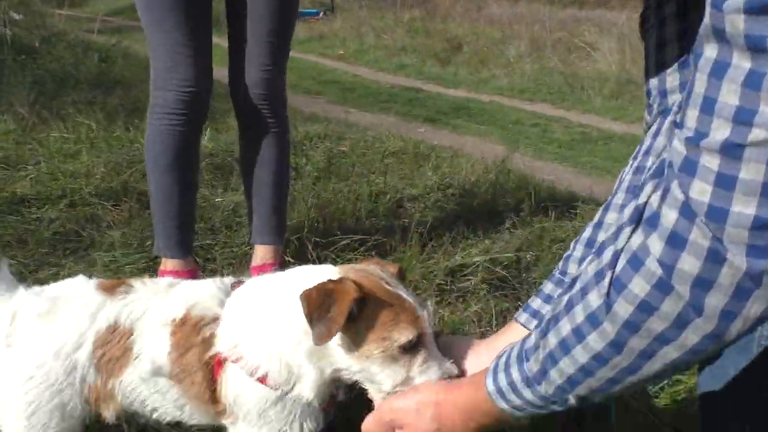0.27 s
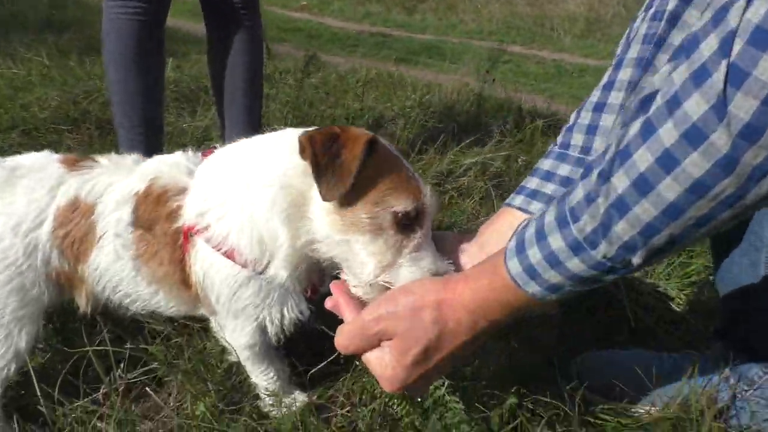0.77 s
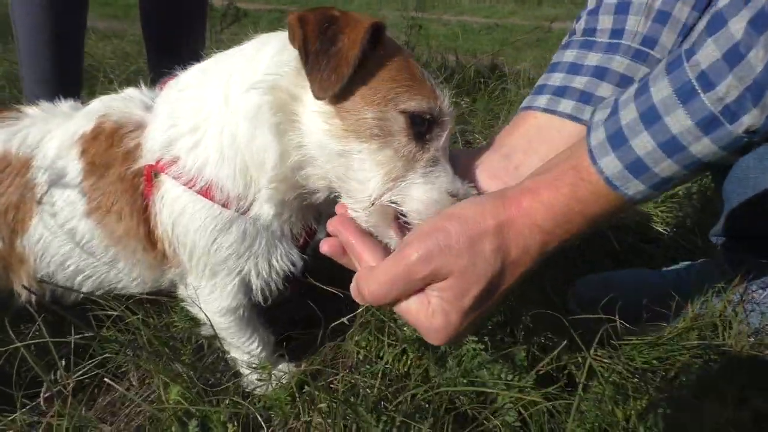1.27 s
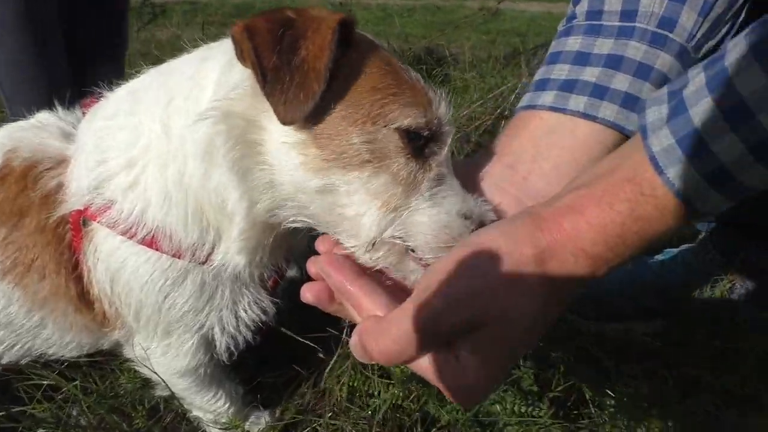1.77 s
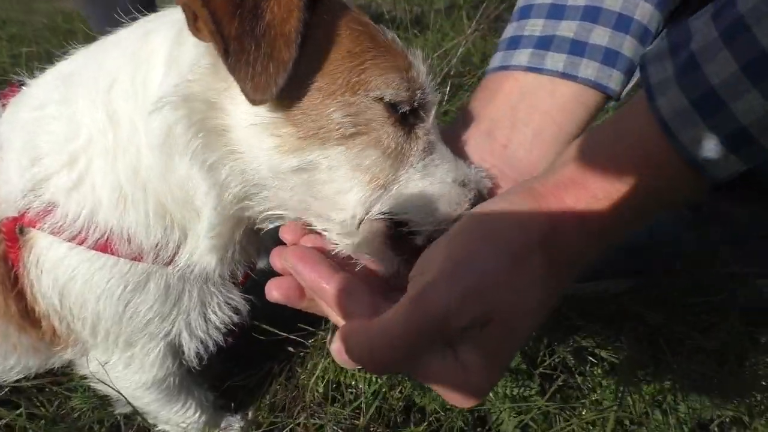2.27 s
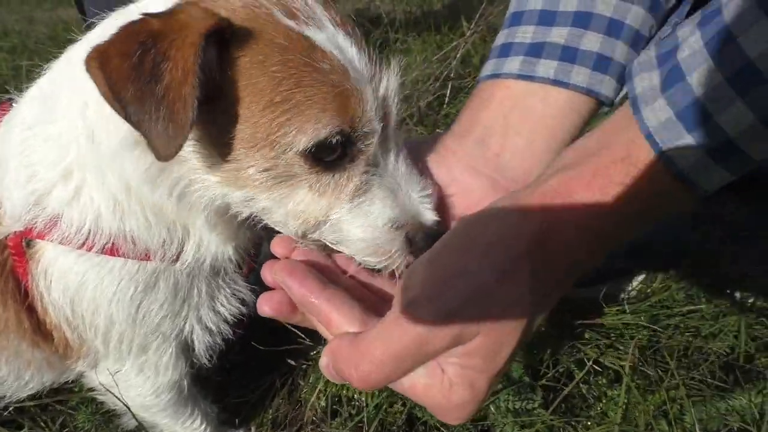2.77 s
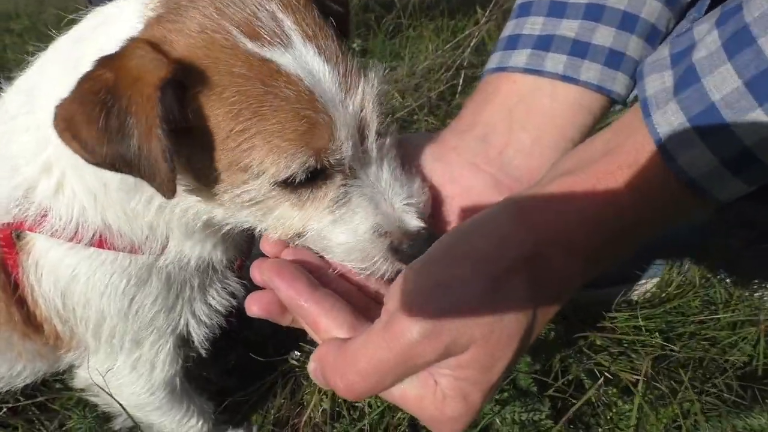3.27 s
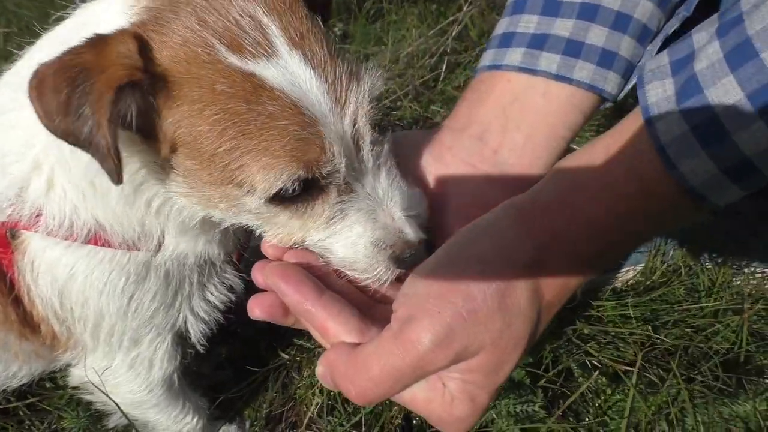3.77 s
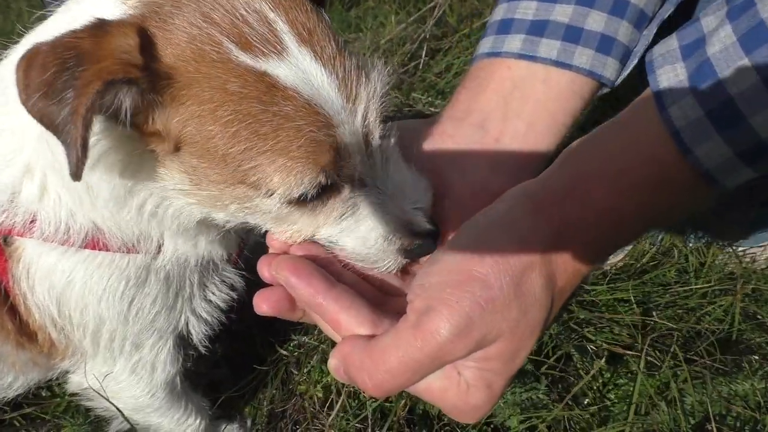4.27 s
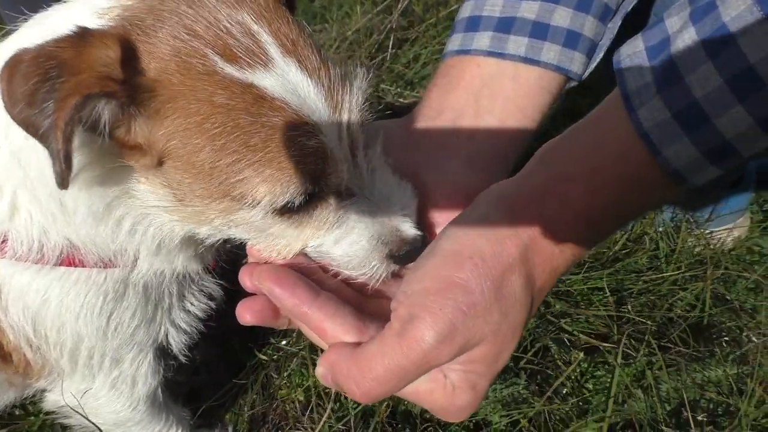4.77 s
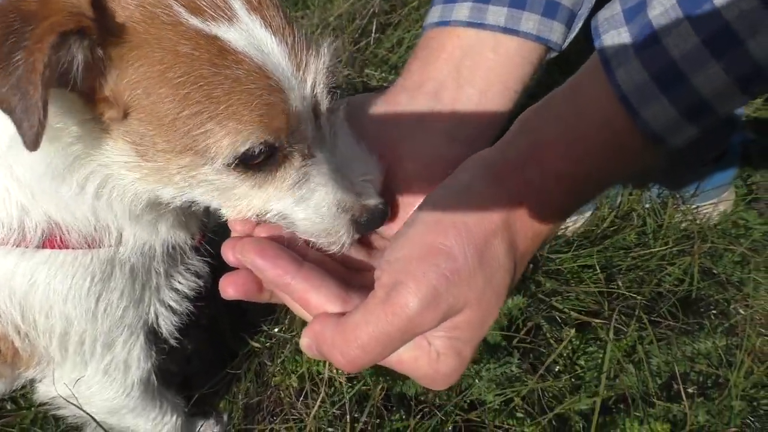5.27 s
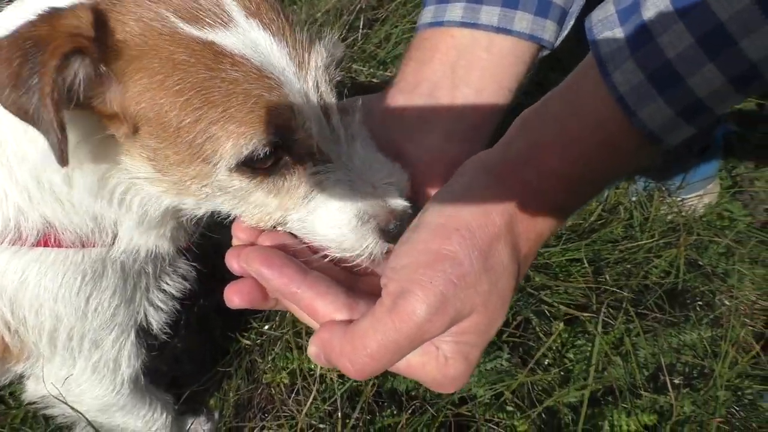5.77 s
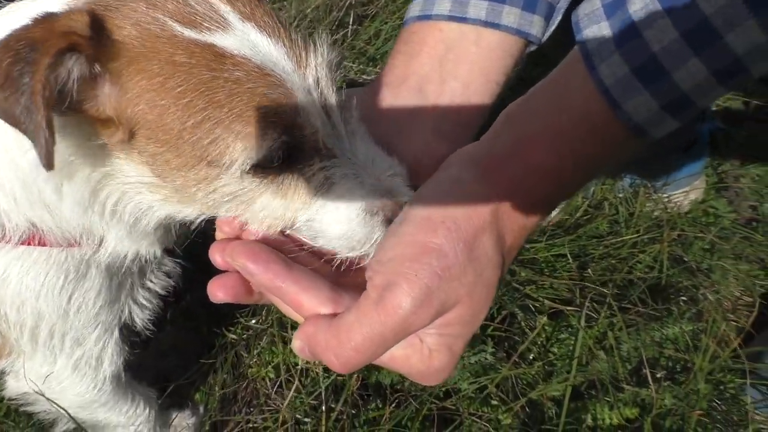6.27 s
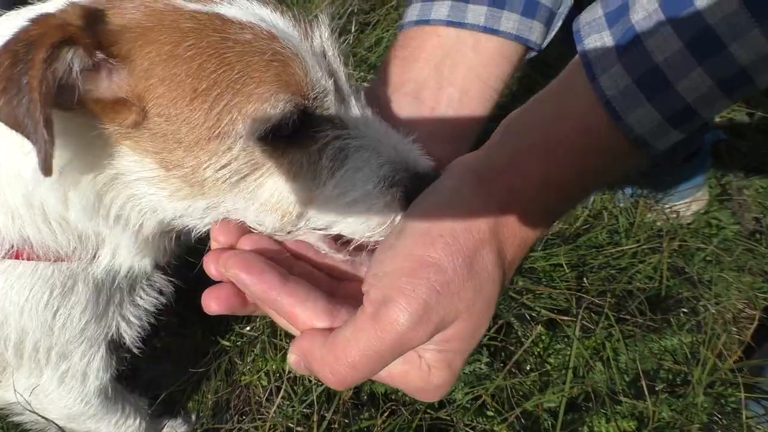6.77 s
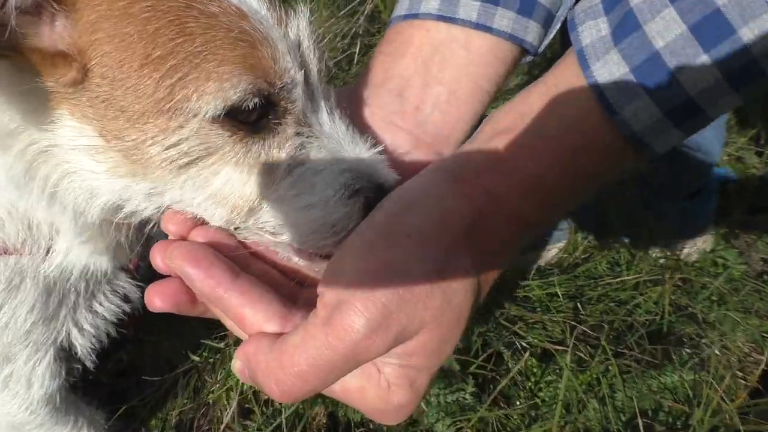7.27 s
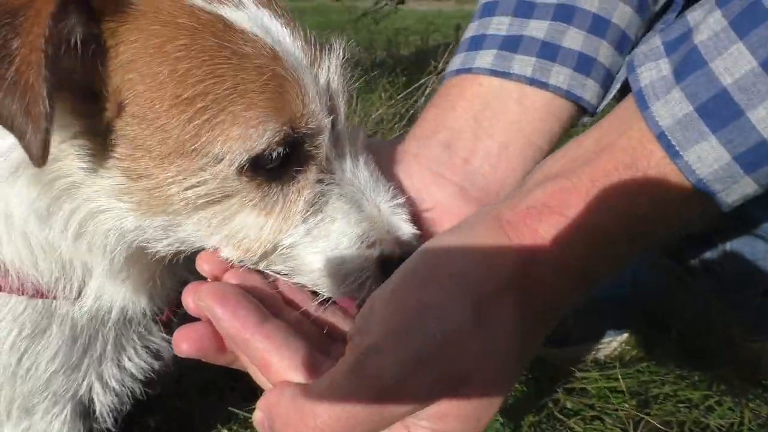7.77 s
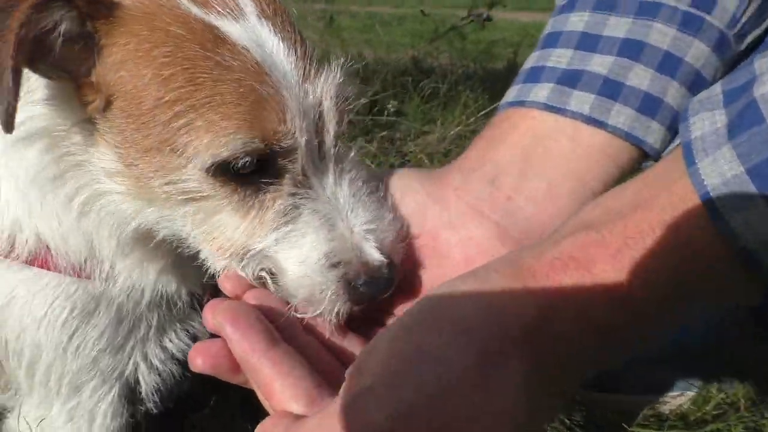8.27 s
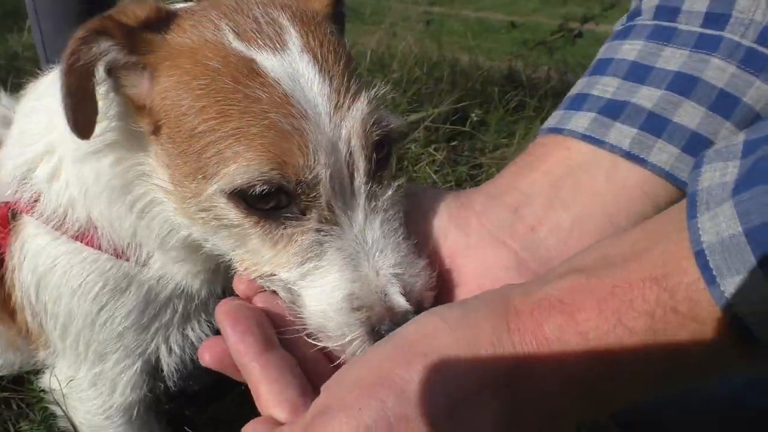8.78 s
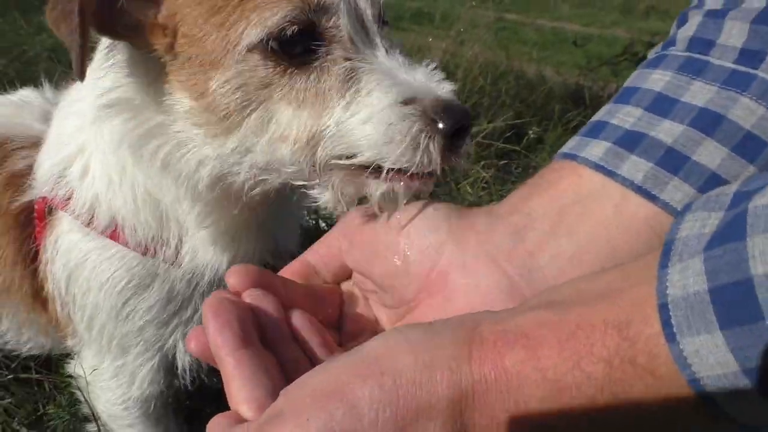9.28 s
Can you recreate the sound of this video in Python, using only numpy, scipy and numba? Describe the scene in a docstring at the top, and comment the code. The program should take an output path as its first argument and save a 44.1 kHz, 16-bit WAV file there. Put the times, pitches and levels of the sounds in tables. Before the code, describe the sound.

From 0 to 0.5 s, grass and cloth rustle briefly and a very short thin whistle is heard over soft meadow air and distant road rumble. A small dog begins lapping from a cupped palm, close to the microphone: gentle wet dips and smacks from about 0.5 s, with a sharp spit snap near 1.9 s. A little rustling returns around 2.8 s. The licks grow quicker and brighter, three per second, loudest from 3.5 to 5.4 s, each a bubbly slurp, popping water and a crisp lip smack. At 5.4 s a strong click comes with a dull muzzle bump, and the background suddenly falls quieter, then slowly returns. From 5.6 to 9.1 s the licks are softer and more separated, with one bright pop and bump at 7.7 s. Around 9.3 s come two faint thumps, a last weak smack and a tiny high whistle. Faint engine hums waver far away.

```python
"""First a brief rustle and a thin whistle over a far road's rumble; then a small dog laps water from a cupped
hand in a meadow, close to the microphone. Each lick bursts air pockets, modelled as decaying sines of rising
pitch; snapping spit, a slurp of many small bubbles and smacks ringing the mouth cavity surround them.
Grass and cloth rustle as flickering noise, engine notes hum as wavering sines, thin whistles come and go."""
import sys
import numpy as np
from scipy import signal
from scipy.fft import rfft, irfft, next_fast_len
from scipy.io import wavfile
from scipy.ndimage import uniform_filter1d
from numba import njit

SR = 44100
rng = np.random.default_rng(int(sys.argv[2]) if len(sys.argv) > 2 else 0)


def materialize(psi):
    """Save the field psi as 16-bit PCM at rate SR to the path in sys.argv[1].

    A 1-D psi becomes a single channel; in a 2-D psi each row is a channel.
    """
    bounded = np.clip(np.atleast_2d(psi).T, -1, 1)
    quanta = np.round(bounded * 32767).astype(np.int16)
    wavfile.write(sys.argv[1], SR, quanta)


N = 419391
T = np.arange(N) / SR


def undb(db):
    """Decibel definition: amplitude gain of a level in dB."""
    return 10 ** (np.asarray(db) / 20)


def level(x, db):
    """Normalisation by effective value: scale to an rms level in dB."""
    return x * undb(db) / np.sqrt(np.mean(x ** 2))


@njit
def bubbles(s, gain, hz, t60, glide, rise_s):
    """Free decay of an air pocket: a sine falls 60 dB in t60 while its pitch climbs as the pocket opens."""
    out = np.zeros(N)
    for k in range(len(s)):
        i, phase, f = int(s[k] * SR), 0., hz[k]
        length = int(t60[k] * SR)
        for j in range(min(length, N - i)):
            phase += 2 * np.pi * min(f * (1 + glide * j / length), .45 * SR) / SR
            onset = 1 - np.exp(-j / (rise_s * SR))
            out[i + j] += gain[k] * onset * np.exp(-6.9 * j / length) * np.sin(phase)
    return out


def swarm(s, db, hz, late_s, spread, drop_db, cycles, count):
    """Secondary bubbles: each burst is followed by weaker ones scattered in time, pitch and strength."""
    u = rng.random((len(s), count, 3))
    at = s[:, None] + late_s * u[..., 0]
    f = hz[:, None] * np.exp(spread * (2 * u[..., 1] - .6))
    f = np.clip(f, 1150, 15500)
    gain = undb(db[:, None] - drop_db - 6 * u[..., 2])
    return bubbles(at.ravel(), gain.ravel(), f.ravel(), (cycles / f).ravel(), .15, .0002)


def stream(low_hz, span, skew, spread_db, cycles, count, size, glide=.2):
    """Random superposition: bubbles burst in groups of size that share a moment and a strength; rms 1."""
    u = rng.random((count, 4))
    lead = u[np.arange(count) // size * size]  # each group borrows one row of draws
    s = lead[:, 0] * T[-1] + .0015 * u[:, 0]
    hz = low_hz * np.exp(span * u[:, 1] ** skew)
    gain = undb(-spread_db * np.log(.03 + lead[:, 2]))
    t60 = cycles * (.4 + u[:, 3]) / hz
    return level(bubbles(s, gain, hz, t60, glide, .0003), 0)


def swells(s, length, db, rise=1.):
    """Amplitude envelope: bells of given width at half height; rise is rising over falling flank."""
    out = np.zeros(N)
    for at, n, d in np.broadcast(s, length, db):
        near = slice(max(int((at - 2 * n) * SR), 0), int((at + 3 * n) * SR))
        late = T[near] - at + n / 2 * (1 - rise) / (1 + rise)  # time after the peak
        flank = n * np.where(late < 0, rise, 1)
        out[near] += undb(d) * .5 ** (late * (1 + rise) / flank) ** 2
    return out


def walk(rate):
    """Slow random modulation: levels held 1 / rate s and slewed twice; spread near 1."""
    k = int(SR / rate)
    held = np.repeat(rng.standard_normal(N // k + 1), k)
    return 1.523 * uniform_filter1d(uniform_filter1d(held, k), k)[:N]


def along(table, hz):
    """Spectral interpolation: read a table over log frequency."""
    f, v = np.transpose(table)
    return np.interp(np.log(hz + 1), np.log(f), v)


# coherence of the diffuse field: (frequency [Hz], left-right correlation [1])
LIKENESS = [(30, 0.83), (150, 0.97), (400, 0.83), (3000, 0.84)]


def hiss(colour):
    """Spectral shaping of noise: independent mid and side set the left-right correlation; overall rms 1."""
    size = next_fast_len(N)
    hz = np.arange(size // 2 + 1) * SR / size
    likeness = np.clip(along(LIKENESS, hz), 0, 1)
    mid, side = (rfft(rng.standard_normal(size)) * undb(along(colour, hz)) for _ in range(2))
    mid = irfft(mid * np.sqrt(1 + likeness), size)[:N]
    side = irfft(side * np.sqrt(1 - likeness), size)[:N]
    return level(np.array([mid + side, mid - side]), 0)


# the background level, as if turned down by a recorder's gain control, drops suddenly at 5.4 s
# and creeps back: (time [s], level offset [dB])
BACKGROUND = [(0, -4), (5.40, -7), (5.425, -20), (5.52, -13), (8.8, -11), (9.51, -7.5)]


def background_db():
    """Level contour: piecewise-linear offset in dB, one value per sample."""
    return np.interp(T, *np.transpose(BACKGROUND))


# the loudest air pockets burst by the tongue: (time [s], level [dB], starting pitch [Hz])
POPS = [(0.7077, -23, 2410), (0.7118, -20.5, 2380), (0.7931, -24.5, 1750), (0.9988, -19, 2490),
        (1.2253, -15, 2060), (1.2375, -23, 1500), (1.32, -32, 740), (1.372, -30, 1150),
        (1.6642, -18.5, 1570), (1.761, -17.5, 2700), (1.7828, -24, 1270), (1.8282, -22, 2050),
        (1.841, -15.5, 2660), (2.1237, -20.5, 2180), (2.1354, -28, 1100), (2.2148, -17, 2980),
        (2.2559, -12.5, 1710), (2.3993, -22, 1950), (2.4324, -13, 2880), (2.4411, -11.5, 2630),
        (2.5, -34, 700), (2.5417, -18.5, 1730), (2.595, -27, 3000), (2.765, -26, 1280), (2.785, -22, 2300),
        (2.8004, -21, 1210), (2.8588, -13.5, 1600), (2.8948, -8.5, 1570), (3.024, -21, 1440),
        (3.0325, -18, 2520), (3.0467, -17, 2600), (3.0624, -19, 2800), (3.0808, -15.5, 2780),
        (3.1241, -24, 1470), (3.14, -23, 1610), (3.177, -14.5, 1320), (3.3336, -20, 2430),
        (3.351, -15, 2100), (3.371, -14.5, 2390), (3.3847, -15, 3010), (3.4545, -16, 2490),
        (3.4572, -10, 3990), (3.608, -23, 1220), (3.6125, -31, 744), (3.756, -22, 4500),
        (3.7595, -19, 1560), (3.7667, -18, 1650), (3.7812, -10, 1890), (3.9438, -11, 4600),
        (3.9715, -9.5, 2480), (3.9951, -16, 1840), (4.0058, -17, 2940), (4.0141, -22, 2520),
        (4.0356, -23, 1660), (4.0886, -5.5, 2620), (4.0984, -23, 1310), (4.17, -18, 1460),
        (4.1712, -20, 3400), (4.2284, -13.5, 3170), (4.2413, -11, 1900), (4.2503, -17, 2200),
        (4.255, -10, 2140), (4.276, -24, 2500), (4.283, -24, 2400), (4.3, -20, 1870), (4.3136, -13.5, 2580),
        (4.339, -25, 2900), (4.3783, -3.5, 2860), (4.383, -10, 2770), (4.5707, -20.5, 2370),
        (4.5848, -31, 780), (4.5931, -8, 2440), (4.6065, -17, 2350), (4.622, -9, 3120), (4.702, -3.5, 3060),
        (4.7085, -11.5, 2720), (4.884, -22.5, 1570), (4.956, -21.5, 1440), (4.9166, -21, 2760),
        (4.9615, -16, 2090), (5.0417, -20, 3570), (5.0462, -10, 4340), (5.0557, -13, 2540),
        (5.1913, -24, 1830), (5.2826, -13.5, 2580), (5.3141, -24, 2610), (5.3581, -22, 1160),
        (5.3703, -17, 2540), (5.395, -19, 1430), (5.4045, -3, 4160), (5.4157, -24, 1140),
        (5.5593, -26, 1160), (5.6066, -19.5, 2000), (5.6143, -22, 1740), (5.696, -28, 2710),
        (5.717, -19.5, 2500), (5.7244, -24, 1520), (5.9689, -21.5, 1920), (5.9856, -28, 2240),
        (6.0493, -19.5, 2170), (6.056, -25, 1600), (6.067, -29, 1350), (6.2111, -26, 1720),
        (6.3189, -28, 1810), (6.3647, -24, 2600), (6.3925, -28, 1960), (6.5848, -23.5, 2900),
        (6.6247, -23, 2150), (6.674, -15.5, 4710), (6.6857, -19, 3380), (6.696, -14.5, 3220),
        (6.6966, -19, 1210), (6.8502, -29, 2610), (6.984, -19, 3600), (7.004, -11.5, 3030),
        (7.0124, -22.5, 1310), (7.0227, -15.5, 4070), (7.2212, -20, 2520), (7.3551, -20, 1480),
        (7.7119, -5.5, 4420), (7.7463, -24, 1500), (7.9555, -26, 1520), (8.0225, -18, 3170),
        (8.038, -22.5, 1570), (8.042, -20, 1510), (8.069, -24, 3280), (8.074, -16, 1540),
        (8.2002, -20, 2830), (8.3078, -29, 1310), (8.3338, -21, 2900), (8.4053, -18, 2740),
        (8.5046, -23.5, 1740), (8.7225, -19, 1600), (8.7262, -18, 2150), (8.7412, -23, 1400),
        (8.7445, -19, 1500), (9.0912, -18, 4310), (9.1106, -17, 3290), (9.1202, -24, 1390)]


def pops():
    """Bubble resonance: pockets crack open and ring a few cycles, with a ragged spray and a bright edge."""
    s, db, hz = np.transpose(POPS)
    ring = bubbles(s, undb(db), hz, 20 / hz, .08, .00045)
    crack = bubbles(s, undb(db - 9.), 1.3 * hz, 6.5 / hz, .3, .00015)
    spray = swarm(s, db, hz, .006, .4, 10., 16., count=3)
    edge = swarm(s, db, 3 * hz, .002, .4, 22., 22., count=2)
    return ring + crack + spray + edge


DIP_S, SCOOP_S = .045, .055  # widths at half height
DIP_FIZZ_DB = -11  # fizz relative to gurgle
DRIPS_DB = -52.5  # before the background contour
# every lick, the tongue dips in, scoops, and the mouth smacks shut:
# (dip time [s], dip level [dB], scoop time [s], scoop level [dB], scoop fizz above gurgle [dB],
#  smack time [s], smack width at half height [s], smack level [dB], smack fizz above gurgle [dB])
LICKS = [(0.467, -46, 0.702, -43, -13, 0.793, .012, -47, -9),
         (0.933, -50, 1.008, -46, -6, 1.233, .03, -43, -12),
         (1.338, -49, 1.575, -39, -16, 1.664, .012, -48, -9),
         (1.803, -39, 1.847, -42, -12, 1.928, .014, -36, -4),
         (2.08, -55, 2.147, -41.5, -8.5, 2.26, .012, -39, 0),
         (2.36, -52, 2.428, -41, -25, 2.541, .017, -33, -5),
         (2.775, -39, 2.863, -46, -11, 2.897, .014, -46, -6),
         (2.964, -47.5, 3.044, -36.5, -11, 3.18, .014, -42, -6),
         (3.282, -44.5, 3.356, -37.5, -9.5, 3.454, .016, -30, -5.5),
         (3.553, -47, 3.623, -35, -14, 3.758, .013, -29, -6),
         (3.904, -47, 3.975, -36, -15, 4.091, .012, -29, -14),
         (4.2, -43, 4.26, -35, -17, 4.381, .008, -28, -9),
         (4.52, -50, 4.59, -39, -11.5, 4.708, .017, -35, -8.5),
         (4.82, -48, 4.92, -40, -17, 5.049, .018, -31, -10),
         (5.197, -41, 5.292, -38, -12, 5.39, .035, -36, -10),
         (5.505, -49, 5.6, -45, -10, 5.715, .013, -33, -5),
         (5.67, -49, 5.971, -49.5, -7.5, 6.048, .022, -40, -16),
         (6.2, -56, 6.304, -47, -9, 6.372, .02, -38, -16),
         (6.571, -49, 6.622, -45.5, -18, 6.692, .018, -36, -12),
         (6.877, -54, 6.938, -47, -13, 7.006, .025, -34, -14),
         (7.13, -58, 7.223, -48, -9, 7.358, .011, -31, -11),
         (7.55, -56, 7.612, -48, -9, 7.71, .014, -37, -4),
         (7.863, -53, 7.954, -44, -5, 8.074, .012, -36, -4),
         (8.245, -53, 8.318, -46, -8, 8.409, .022, -38, -6),
         (8.56, -48, 8.643, -47, -8, 8.723, .009, -33, -7), (8.906, -56, 9, -47, -5, 9.104, .03, -41, -5),
         (9.28, -53, 9.38, -53, -8, 9.46, .06, -55, -10)]


def slurp():
    """Bubble-cloud superposition: strokes swell with gurgle, far-gliding bubbles and fizz; drips between."""
    dip_s, dip_db, scoop_s, scoop_db, scoop_fizz_db = np.transpose(LICKS)[:5]
    dip = swells(dip_s, DIP_S, dip_db)
    gurgle_gain = dip + swells(scoop_s, SCOOP_S, scoop_db)
    fizz_gain = undb(DIP_FIZZ_DB) * dip + swells(scoop_s, SCOOP_S, scoop_db + scoop_fizz_db)
    gurgle = stream(1120., 1.25, 1.05, 4.4, 30., count=4500, size=2)
    gurgle += undb(-7) * stream(1200., .9, 1.1, 4.5, 60., count=500, size=1, glide=1.1)
    fizz = stream(4000., 1.3, .95, 4.6, 30., count=6000, size=3)
    drips = stream(1124., 2.555, 1.207, 2.7, 40., count=1500, size=2)
    return gurgle_gain * gurgle + fizz_gain * fizz + undb(background_db() + DRIPS_DB) * drips


def crackle(per_s, spread_db):
    """Impulsive shot noise: single clicks at random moments, most of them small; rms 1."""
    u = rng.random((N, 3))
    clicks = (u[:, 0] < per_s / SR) * np.sign(u[:, 1] - .5)
    return level(clicks * undb(-spread_db * np.log(.03 + u[:, 2])), 0)


# cavity of the closing mouth: (resonance [Hz], width of each filter pass [Hz], level [dB])
MOUTH = [(1600, 500, 0), (2800, 700, -4), (4600, 800, -9), (7600, 1500, -15)]


def mouth(x):
    """Cavity resonance: parallel modes, each filtered twice, ring briefly at every click; rms 1."""
    out = np.zeros(N)
    for hz, width, db in MOUTH:
        b, a = signal.iirpeak(hz, hz / width, SR)
        out += undb(db) * signal.lfilter(b, a, signal.lfilter(b, a, x))
    return level(out, 0)


SMACK_RISE, FIZZ_SHARE = .3, .6  # rise over fall; fizz width over smack width
PLOP_HZ, PLOP_DB = 690, -12  # low pocket of the closing mouth; level relative to the smack


def smacks():
    """Impulse excitation of a cavity: tearing spit rings the mouth, with gurgle, fizz and a low pocket."""
    s, length, db, fizz_db = np.transpose(LICKS)[5:]
    wet = mouth(crackle(600., 4.5))
    wet = wet + undb(-7) * stream(1150., 1.1, 1.2, 3.5, 18., count=7000, size=1)
    fizz = stream(4000., 1.3, .9, 4., 28., count=16000, size=4)
    plop = bubbles(s, undb(db + PLOP_DB), PLOP_HZ + 0 * s, .024 + 0 * s, .08, .0004)
    wet_gain = swells(s, length, db, SMACK_RISE)
    fizz_gain = swells(s, FIZZ_SHARE * length, db + fizz_db, SMACK_RISE)
    return wet_gain * wet + fizz_gain * fizz + plop


# the loudest spit films that snap at the lips: (time [s], level [dB], starting pitch [Hz])
TICKS = [(0.025, -24.5, 5700), (1.102, -31, 11500), (1.193, -29, 11000), (1.3447, -28, 5450),
         (1.536, -28, 10500), (1.5518, -23, 9100), (1.8, -27, 11500), (1.821, -28, 7600), (1.925, -6, 8300),
         (2.136, -28, 10500), (2.2144, -22, 7660), (2.2557, -24, 7030), (2.354, -30, 11500),
         (2.378, -27, 9500), (2.5416, -22, 9700), (3.1364, -24.5, 7400), (3.4466, -18.5, 9300),
         (3.4514, -18, 6600), (3.6153, -24, 5600), (3.755, -19, 13500), (3.7661, -21, 8000),
         (3.7808, -20, 7100), (4.2552, -27, 5400), (4.261, -26.5, 7200), (4.38, -18, 9050),
         (4.5716, -29, 5080), (4.702, -18, 8010), (5.045, -10, 11800), (5.0487, -9, 11200),
         (5.256, -28, 12000), (5.2865, -20, 4800), (5.3868, -24, 6230), (5.405, -17, 10500),
         (5.7114, -14, 11700), (5.7168, -18, 12400), (6.0526, -26.5, 8700), (6.0138, -32, 6000),
         (6.893, -35, 10000), (7.3455, -32, 6000), (7.3538, -30, 8500), (7.3597, -30, 8000),
         (7.7031, -21, 9400), (7.7117, -13, 5020), (7.712, -19, 13000), (8.042, -28, 6000),
         (8.0734, -21, 4900), (8.4083, -25, 12390), (8.7225, -24, 4500), (8.7415, -28, 4800)]


def ticks():
    """Film rupture: spit snaps as short clusters of very small bubbles, closely spaced in pitch."""
    s, db, hz = np.transpose(TICKS)
    snap = bubbles(s, undb(db), hz, 18 / hz, .018, .0001)
    return snap + swarm(s, db, hz, .003, .3, 2., 26., count=7)


# thumps of muzzle on palm: (time [s], level [dB], pitch [Hz])
THUMPS = [(5.406, -22.5, 302), (7.711, -26.5, 305), (9.272, -32, 250), (9.292, -34, 250)]


def thumps():
    """Heavily damped impact: the muzzle knocks the palm with one short dull push."""
    s, db, hz = np.transpose(THUMPS)
    return bubbles(s, undb(db), hz, np.full(len(s), .005), 0., .00024)


# thin whistles, perhaps the dog's nose; the level is before flutter, the pitch before jitter:
# (start [s], end [s], first pitch [Hz], middle pitch [Hz], last pitch [Hz], level [dB])
WHISTLES = [(0, .1, 1955, 1985, 2010, -53), (4.73, 4.82, 10050, 9750, 9300, -70),
            (7.03, 7.15, 9650, 10050, 9200, -68), (9.43, 9.49, 9500, 9750, 9900, -62),
            (9.43, 9.51, 14500, 14600, 14500, -65)]


def whistles():
    """Frequency modulation: thin tones glide along parabolas, with small flutter in level and pitch."""
    out = np.zeros(N)
    for start, end, first_hz, mid_hz, last_hz, db in WHISTLES:
        at = np.clip((T - start) / (end - start), 0, 1)
        hz = np.polyval(np.polyfit([0, .5, 1], [first_hz, mid_hz, last_hz], 2), at)
        on = np.clip(8 * np.minimum(at, 1 - at), 0, 1)
        jitter = .004 * min(first_hz, 3000) / hz * walk(40)
        phase = 2 * np.pi * np.cumsum(hz * (1 + jitter)) / SR
        out += on * undb(db + 2.5 * walk(40)) * np.sin(phase)
    return out


RUSTLE_BED_DB = -62  # before the background contour
# spectrum of the rubbing: (frequency [Hz], relative density [dB per Hz])
RUSTLE_COLOUR = [(900, -30), (1500, -8), (3000, -4), (7500, -2), (11000, 1), (15800, -1)]
# grass and cloth rustling: (centre [s], width at half height [s], envelope level [dB])
RUSTLES = [(0.0, .1, -48), (0.18, .08, -46), (0.43, .2, -46), (1.03, .2, -56), (1.55, .2, -55),
           (2.83, .15, -46), (3.1, .4, -57), (9.5, .2, -60)]


def rustle():
    """Friction noise: blades and cloth rub as an unevenly flickering hiss with fine crackle."""
    flicker = 1.2 * walk(60) + 1.6 * walk(17)  # in dB
    gain = swells(*np.transpose(RUSTLES)) + undb(RUSTLE_BED_DB + background_db())
    snaps = stream(6000., .9, .9, 5., 22., count=900, size=6)
    return (hiss(RUSTLE_COLOUR) * undb(flicker) + undb(-9) * snaps) * gain


AIR_DB = -46  # before the background contour and the slow drift
# spectrum of meadow air and far road: (frequency [Hz], relative density [dB per Hz])
MEADOW = [(20, -54), (45, -8), (70, -3), (175, -0.5), (400, -10), (620, -17.5), (850, -15), (1100, -8),
          (1500, -10.5), (3000, -15), (6000, -24.5), (15800, -33.5)]
# far engine notes: (start [s], end [s], mean pitch [Hz], level before flutter [dB])
HUMS = [(0.095, .45, 214.6, -58), (1.5, 2.765, 214.2, -56), (3.3, 5.297, 170.7, -64),
        (5.5, 7.8, 170.7, -65)]


def surroundings():
    """Diffuse background noise: meadow air and far road as coloured hiss, with wavering engine notes."""
    air = hiss(MEADOW) * undb(AIR_DB + background_db() + .33 * walk(2.43))
    for start, end, hz, db in HUMS:
        swell = np.clip(np.minimum(T - start, end - T) / .09, 0, 1)
        flutter = 2.5 * walk(12)  # in dB
        phase = 2 * np.pi * np.cumsum(hz * (1 + .008 * walk(7))) / SR
        air = air + swell * undb(db + flutter) * np.sin(phase)
    return air


PALM_HZ = 860  # high-pass corner of the water sounds
LEFT_DB = .3  # the dog's common part is this much stronger at the left


def scene():
    """Stereo phase difference: the dog sits in the middle, slightly out of phase at two microphone ports."""
    # so small a pool radiates little below about a kilohertz
    small_pool = signal.butter(3, PALM_HZ, "high", fs=SR, output="sos")
    water = signal.sosfilt(small_pool, pops() + slurp() + smacks())
    snaps = ticks()
    dog = water + snaps + thumps() + whistles()
    quadrature = signal.hilbert(dog, next_fast_len(N)).imag[:N]
    wide = undb(-21) * quadrature + .07 * snaps  # the lips lie a little to the left
    return np.array([undb(LEFT_DB) * dog + wide, dog - wide]) + surroundings() + rustle()


TOP_HZ = 15700  # upper band limit


def record(dry):
    """Band limitation: a steep elliptic low-pass cuts the top."""
    return signal.sosfilt(signal.ellip(10, .2, 70, TOP_HZ, fs=SR, output="sos"), dry)


dry = scene()
out = record(dry)
materialize(out)
```